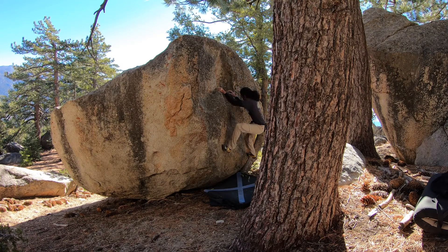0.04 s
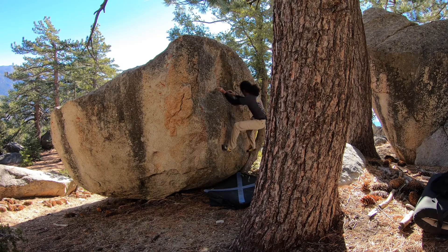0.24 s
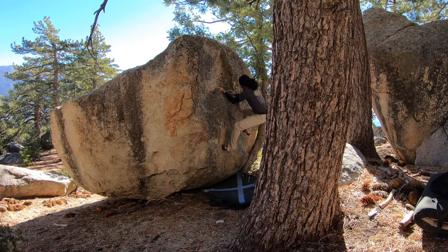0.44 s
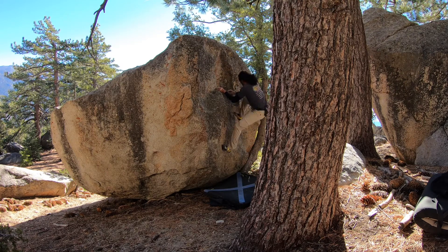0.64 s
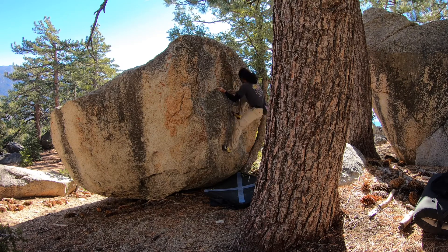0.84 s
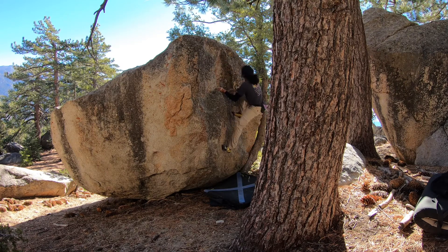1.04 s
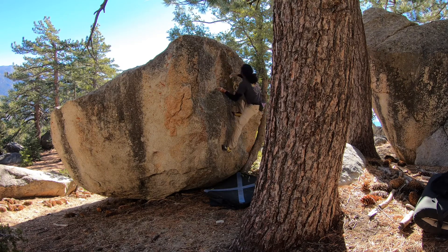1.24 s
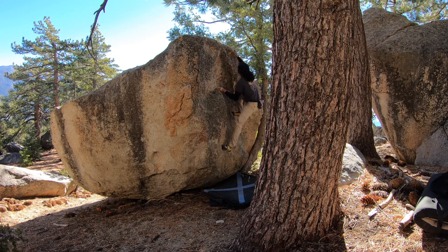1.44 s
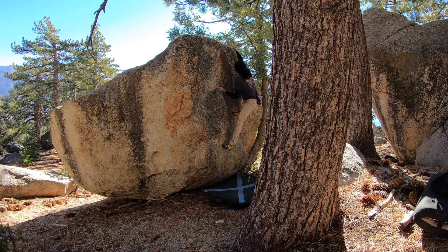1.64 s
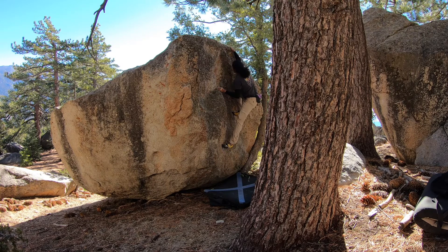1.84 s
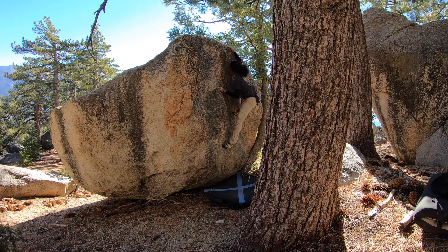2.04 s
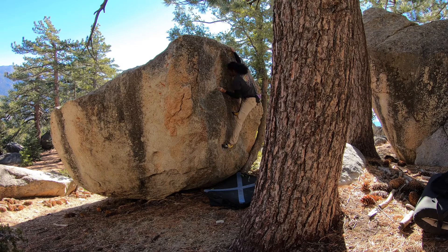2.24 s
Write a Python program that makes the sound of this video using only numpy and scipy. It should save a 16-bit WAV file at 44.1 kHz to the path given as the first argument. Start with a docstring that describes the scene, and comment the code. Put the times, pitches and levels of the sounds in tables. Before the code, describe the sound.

Low, fluttering wind buffets a stereo microphone in a pine forest, with a few soft thumps before it weakens. A shoe faintly scuffs a boulder, then taps it once, followed by slight rubs over a quiet rush of treetops.

```python
"""Light wind buffeting a stereo microphone near a boulder in a pine forest.
Gusts rumble on the two ports, fuller the harder they blow, and single eddies thump one side.
Far off, the treetops rush as air pours through the needles. Someone climbing the rock makes
a gritty shoe scuff, a dry tap that scatters among the trunks, and a few faint ticks and rubs."""
import sys
import numpy as np
from scipy import signal
from scipy.fft import rfft, irfft, next_fast_len
from scipy.io import wavfile
from scipy.ndimage import uniform_filter1d

SR = 44100
rng = np.random.default_rng(int(sys.argv[2]) if len(sys.argv) > 2 else 0)


def persist_wave(psi):
    """Save psi, clipped to +-1, as 16-bit WAV."""
    counts = np.round(np.clip(psi, -1, 1) * 32767).astype(np.int16)
    wavfile.write(sys.argv[1], SR, np.atleast_2d(counts).T)


N = 101429
TIME_S = np.arange(N) / SR


def amp(db):
    """Decibels to gain."""
    return 10 ** (np.asarray(db) / 20)


def unit_rms(x):
    """Scale to an rms of 1."""
    return x / np.sqrt(np.mean(x ** 2) + 1e-20)


def curve_at(points, hz):
    """Read (freq_hz, value) points on a log frequency axis."""
    freqs_hz, values = np.transpose(points)
    return np.interp(np.log(hz + 1), np.log(freqs_hz + 1), values)


def equalize(x, response):
    """Zero-phase EQ; response gives the gain at each frequency."""
    size = next_fast_len(N + SR // 2)
    return irfft(rfft(x, size) * response(np.fft.rfftfreq(size, 1 / SR)), size)[..., :N]


def pan(side_db):
    """Constant-power left and right gains; side_db is left minus right."""
    gains = amp(np.array([[0.5], [-0.5]]) * side_db)
    return gains / np.sqrt(np.mean(gains ** 2, axis=0))


def decay(start_s, t60_s):
    """An envelope that jumps to 1 and falls 60 dB in t60_s."""
    age_s = TIME_S - start_s
    return (age_s >= 0) * np.exp(-np.log(1000) * np.abs(age_s) / t60_s)


def stereo_noise(spectrum, correlation):
    """Coloured noise of rms 1, its width set by (freq_hz, left-right correlation) points."""
    def mid_side_gains(hz):
        angle = np.arccos(np.clip(curve_at(correlation, hz), -1, 1)) / 2
        return amp(curve_at(spectrum, hz)) * [np.cos(angle), np.sin(angle)]
    mid, side = equalize(rng.standard_normal((2, N)), mid_side_gains)
    return unit_rms(np.array([mid + side, mid - side]))


def turbulence(spectrum):
    """Churning air, unrelated at the two ports, with its slow swells evened out."""
    noise = stereo_noise(spectrum, correlation=[(1, 0)])
    power = signal.fftconvolve(noise ** 2, np.hanning(SR // 20)[None], mode="same", axes=1)
    return unit_rms(noise / np.sqrt(np.abs(power) + 1e-9))


# Puffs of wind on the ports: centre_s, level_db, half_length_s, side_db
WIND_PUFFS = [(0.093, -52.5, 0.018, -0.5), (0.181, -39, 0.017, 11), (0.243, -22.5, 0.02, -4),
              (0.333, -25.5, 0.032, 4), (0.422, -32.5, .012, 2), (0.49, -30, 0.02, 2.5),
              (0.52, -27.5, 0.017, 2.5), (0.586, -36, 0.013, -6), (0.645, -36, 0.045, 10.5),
              (0.756, -39, .018, -1.5), (0.827, -41.5, 0.017, -9.5), (0.891, -30.5, 0.02, 0),
              (0.962, -29.5, 0.032, 0.5), (1.043, -42.5, 0.029, -3.5), (1.102, -42.5, 0.0091, 2),
              (1.169, -47, 0.025, 6.5), (1.329, -52, .025, 2), (1.478, -46, 0.046, -9.5),
              (1.697, -45, 0.014, -6.5), (1.773, -41, 0.024, -1), (1.837, -49, 0.015, -7),
              (1.963, -40, 0.013, -6.5), (1.995, -44.5, 0.018, 8), (2.132, -49.5, 0.021, -4)]
# Low end of a moderate gust: freq_hz, gain_db
RUMBLE_EQ = [(12, -18), (26, -1.5), (44, 6.5), (70, -2), (115, -20), (160, -25), (250, -37), (400, -48.5),
             (1000, -100.5)]
# Extra body of a hard gust: freq_hz, gain_db
FLUTTER_EQ = [(30, -19.5), (68, 7.5), (110, -1), (160, -14.5), (230, -20), (350, -37), (600, -58),
              (1500, -86)]

def buffeting():
    """Each puff swells and fades on the ports; the harder it blows, the higher its rumble reaches."""
    breeze_db, hard_gust_db = -63.5, -30  # the draught between puffs; the reference for force
    puff_power = sum((pan(side_db) * amp(db)) ** 2 * np.exp(-((TIME_S - centre_s) / half_s) ** 2)
                     for centre_s, db, half_s, side_db in WIND_PUFFS)
    force_db = 10 * np.log10(puff_power + amp(breeze_db) ** 2) - hard_gust_db
    rumble = amp(-33 + 0.94 * force_db) * turbulence(RUMBLE_EQ)
    flutter = amp(-35 + 1.25 * force_db) * turbulence(FLUTTER_EQ)  # grows faster than the rumble
    return rumble + flutter


# Fader ride of the wind in the treetops, before trim: time_s, level_db
TREETOP_RIDE = [(0, -62), (.5, -64), (1.35, -64), (1.85, -61.5), (2.3, -60)]
# Tone of the needles: freq_hz, gain_db
PINE_EQ = [(25, -1.5), (70, -2.5), (150, -3), (330, -2), (480, -1), (760, 2.5), (1350, 0), (2000, -10),
           (3100, -22), (4500, -29), (6000, -31.5), (7800, -33.5), (10000, -43), (12500, -53.5),
           (16000, -52)]
# Their stereo width: freq_hz, correlation
PINE_CORRELATION = [(80, 0.1), (300, 0.96), (650, .45), (1100, 0.12), (2600, 0.46), (5000, 0.38),
                    (8000, -0.13)]
# Their lean to the left: freq_hz, side_db
PINE_PAN = [(100, -0.5), (400, -0.5), (640, 2), (1030, 6), (2400, 4.5), (4500, -0.5), (8000, -1)]

def treetops():
    """Wind through distant pine needles: a smooth bed that eases, then slowly swells."""
    trim_db = 2.5
    level_db = np.interp(TIME_S, *np.transpose(TREETOP_RIDE))
    needles = stereo_noise(PINE_EQ, PINE_CORRELATION)
    panned = equalize(needles, lambda hz: pan(curve_at(PINE_PAN, hz)))
    return panned * amp(level_db + trim_db)


# Thumps on one port: centre_s, level_db, width_s, side_db
EDDY_THUMPS = [(0.231, -20, 0.0026, -20), (.415, -23.5, 0.0026, -28), (0.966, -25, 0.0026, -19)]

def eddies():
    """Each eddy is one soft push of pressure with a suction before and after."""
    thumps = np.zeros((2, N))
    for centre_s, db, width_s, side_db in EDDY_THUMPS:
        offset = (TIME_S - centre_s) / width_s
        thumps += pan(side_db) * amp(db) * (1 - offset ** 2) * np.exp(-offset ** 2 / 2)
    return thumps


# Shoe and hand rubbing the rock: peak_s, level_db, rise_s, fall_s
ROCK_RUBS = [(0.27, -72, .02, 0.032), (.55, -86, .06, 0.12), (0.969, -83.5, 0.016, .015),
             (1.055, -80.5, 0.033, 0.073), (1.46, -81, 0.021, 0.02), (1.73, -82.5, .012, .025)]
# Grit cracking under the shoe: start_s, level_db
GRIT_CRACKS = [(0.2654, -56), (0.2686, -69.5), (.275, -67), (1.248, -71.5), (1.34, -78.5)]
# Tone of scraped granite: freq_hz, gain_db
GRANITE_EQ = [(600, -12), (1600, -6.5), (2600, 3.5), (3800, 1.5), (5500, 2.5), (7500, -3), (9000, -12),
              (12000, -31.5), (14000, -42)]

def scuffs():
    """Grainy rubbing on granite, with sharp cracks where grit gives way."""
    rubbing = sum(amp(db) * np.exp(-np.maximum((peak_s - TIME_S) / rise_s, (TIME_S - peak_s) / fall_s))
                  for peak_s, db, rise_s, fall_s in ROCK_RUBS)
    cracks = sum(amp(db) * decay(start_s, t60_s=0.027) for start_s, db in GRIT_CRACKS)
    grain_db = 2.63 * unit_rms(uniform_filter1d(rng.standard_normal(N), size=40))  # fast level flicker
    friction = stereo_noise(GRANITE_EQ, correlation=[(3000, 0.76), (8000, 0.3)])
    return np.hypot(rubbing, cracks) * amp(grain_db) * friction


# Two contacts on the rock, close enough to hear as one tap: start_s, level_db
TAP_HITS = [(.8073, -46), (0.81, -54.5)]
# Ring of each contact: pitch_hz, gain_db, t60_s
TAP_RING = [(1670, -7, 0.01), (2270, -0.5, 0.0048), (2570, -10.5, 0.0047), (3930, -27, 0.011),
            (5700, -24, 0.0035)]
# Tone of the scattered tail: freq_hz, gain_db
TAIL_EQ = [(700, -14), (1700, 7), (2600, 12), (4000, -2.5), (6000, -8), (10000, -32)]

def tap():
    """A hard contact rings very briefly and scatters among the trunks and rocks."""
    attack_s, tail_db = 0.000051, -21.5
    ring = np.zeros(N)
    for start_s, db in TAP_HITS:
        age_s = np.maximum(TIME_S - start_s, 0)
        modes = sum(amp(mode_db) * decay(start_s, t60_s) * np.sin(2 * np.pi * hz * age_s)
                    for hz, mode_db, t60_s in TAP_RING)
        ring += amp(db) * modes * (1 - np.exp(-age_s / attack_s))
    tail_envelope = sum(amp(db + tail_db) * decay(start_s, t60_s=0.11) for start_s, db in TAP_HITS)
    tail = tail_envelope * stereo_noise(TAIL_EQ, correlation=[(1, 1)])  # mono
    return pan(side_db=1.2) * (ring + tail)


def scene():
    """Wind near and far, and the climber on the rock."""
    return buffeting() + treetops() + eddies() + scuffs() + tap()


def record(dry):
    """A brick-wall low-pass takes the very top off the mix."""
    cutoff_hz = 15800
    return equalize(dry, lambda hz: hz < cutoff_hz)


dry = scene()
out = record(dry)
persist_wave(out)
```